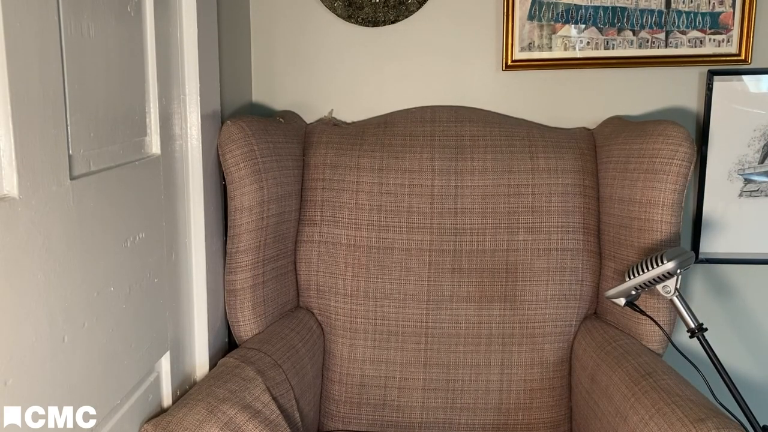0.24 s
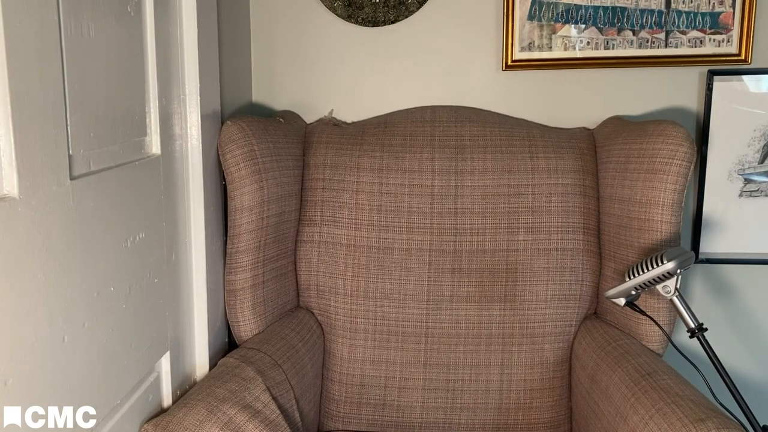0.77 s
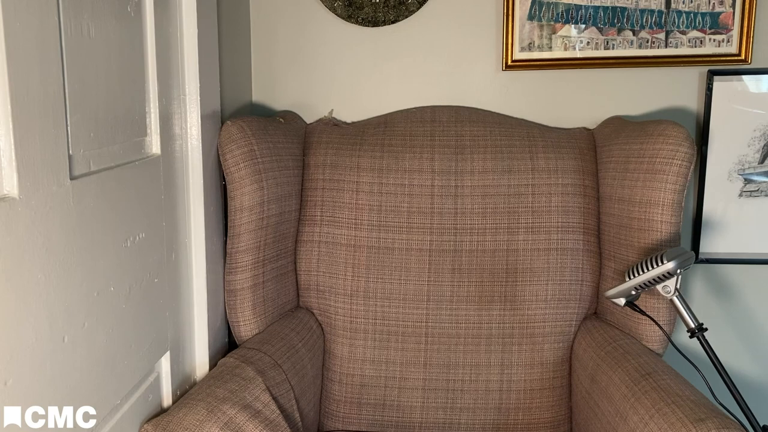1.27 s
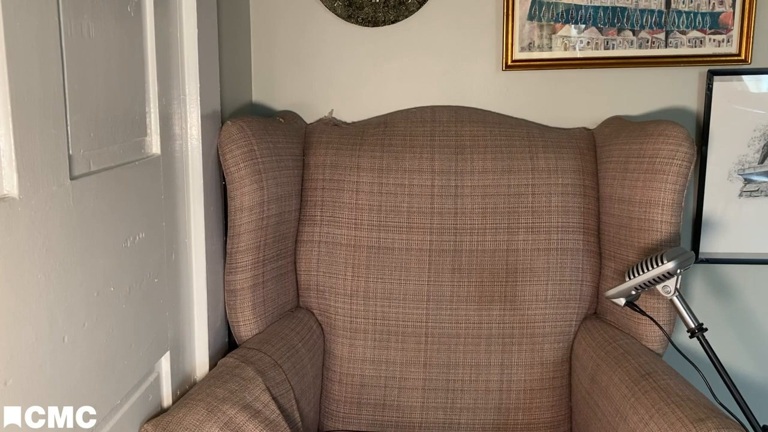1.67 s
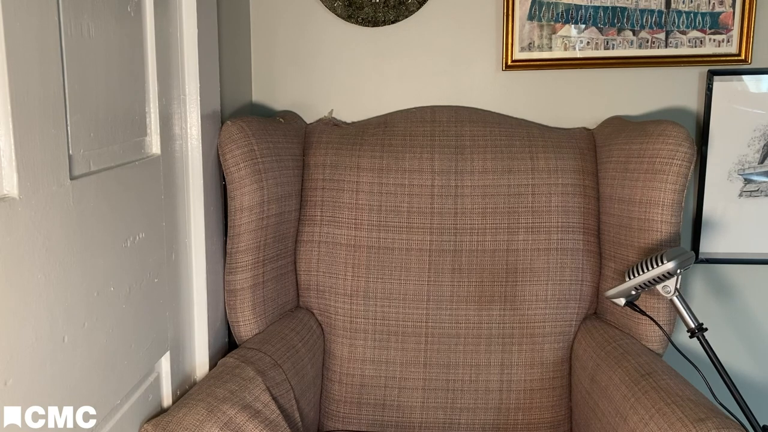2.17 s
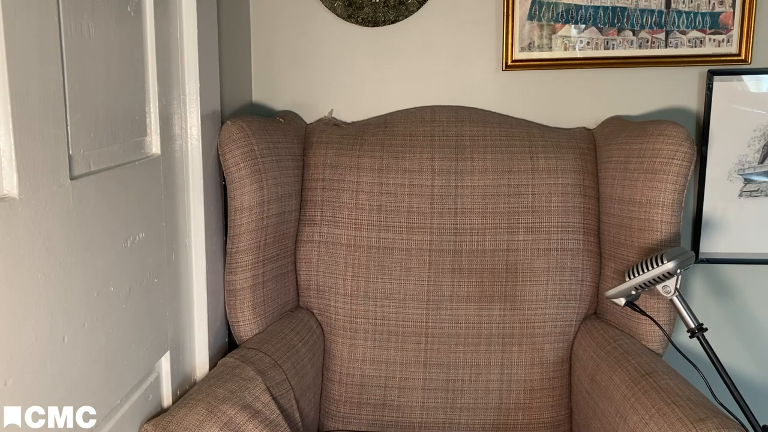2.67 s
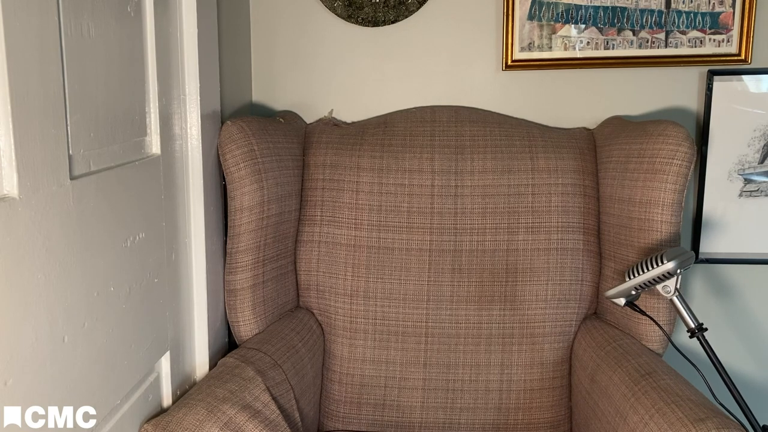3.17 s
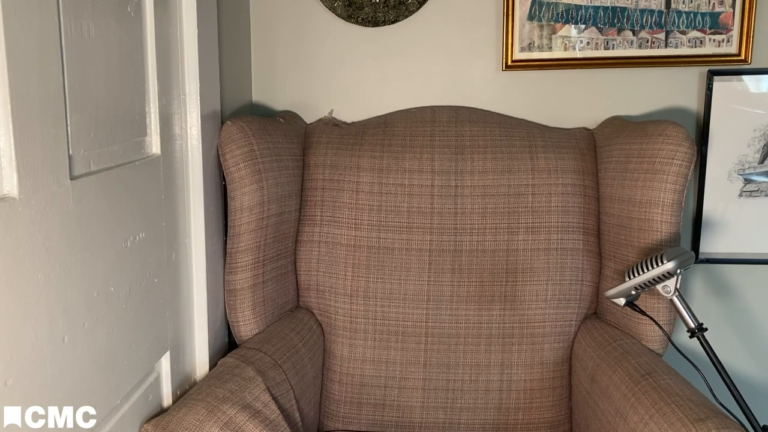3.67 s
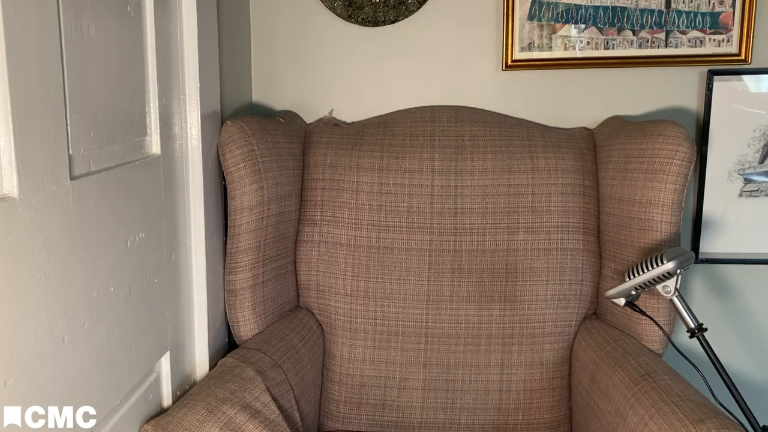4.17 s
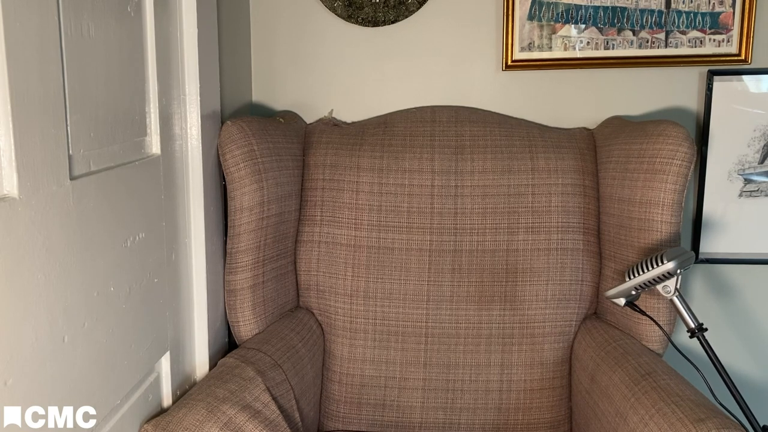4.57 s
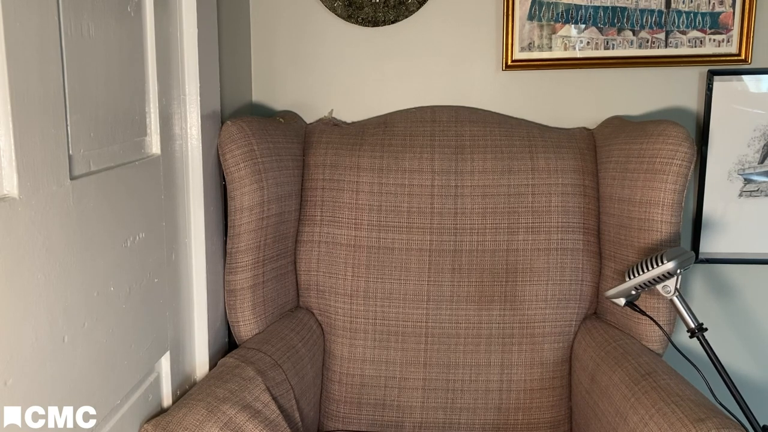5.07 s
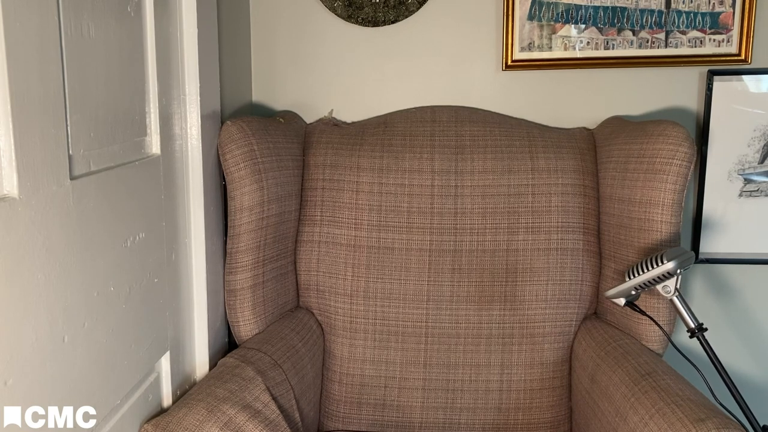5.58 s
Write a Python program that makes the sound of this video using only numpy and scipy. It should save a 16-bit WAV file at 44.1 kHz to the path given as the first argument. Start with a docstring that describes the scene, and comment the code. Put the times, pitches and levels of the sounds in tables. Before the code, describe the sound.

Muffled footsteps and cloth rustle stop, near silence follows, then a heavy door is tugged loose, groans into its frame, slams and clicks shut.

```python
"""Heavy door in an echoing room

Someone shuffles and knocks about in a bare room, then goes to a heavy wooden door: it is tugged free
with a deep thump, judders into its frame and bangs shut; the handle is let go and the latch snaps home.
Contacts are noise bursts with a decaying room echo, the leaf and floor ring as decaying sines, rubbing is
a hail of random slips and the judder a stack of sine partials. Low rumble and faint whine fill the pauses."""
import sys
import numpy as np
from scipy import signal
from scipy.fft import rfft, irfft
from scipy.io import wavfile

SR = 44100
rng = np.random.default_rng(int(sys.argv[2]) if len(sys.argv) > 2 else 0)


def store_pcm(level_fs):
    """Save levels as 16-bit WAV."""
    pcm = np.round(np.clip(level_fs, -1, 1) * 32767).astype(np.int16)
    wavfile.write(sys.argv[1], SR, np.atleast_2d(pcm).T)


N = 257544
TIME = np.arange(N) / SR
TAIL = TIME[:SR]   # one second, the length of every single contact

# wood meeting wood at the door: start_s, level_db, brightness_db_per_octave, fittings_rattle_db
DOOR_BLOWS = [(3.381, -35, -2, -62), (3.386, -27, 2.5, -35.5), (3.41, -25.5, 0, -44),
              (3.527, -32.5, 0.15, -59), (4.128, -17.5, -4.5, -19), (4.144, -15, -4.5, -21),
              (4.165, -19.5, -3, -35.5), (4.183, -39, 0, -45)]
# colour of wood on wood: frequency_hz, level_db
WOOD_COLOUR = [(20, -48), (55, -10), (100, 4.5), (160, 3), (250, 0.5), (400, 1), (700, -2.5), (1100, 0),
               (1500, -5), (2200, -6), (3000, -13), (4200, -9), (5500, -15.5), (7300, -16), (9000, -24),
               (15500, -40)]
# door panels, hinges and lock case: centre_hz, half_width_hz, level_db
FITTING_RESONANCES = [(528, 13, 5.5), (657, 47, 2.5), (773, 13, 5.5), (1017, 10, 3), (1190, 11, 6.5),
                      (1950, 12, -11), (2020, 8, 4), (2330, 6.5, 10.5), (2280, 710, -0.5), (2960, 130, -5),
                      (3170, 97, -5), (4100, 940, -11.5)]
# the door leaf heaving: start_s, level_db, seated (0 swinging free, 1 seated in the frame), dead_thud_db
DOOR_THUMPS = [(3.387, -24, 0.61, -20), (3.409, -4.5, 0.097, -5.5), (3.469, -20, 0, -35),
               (3.699, -19.5, 0.11, -57), (3.774, -23.5, 0.97, -48), (3.872, -22.5, 0.18, -43),
               (4.143, -10.5, 1, 0.5), (4.202, -3, 0.74, 9.5)]
# modes of door and room: frequency_hz, free_db, seated_db, t60_s
DOOR_MODES = [(65.74, -22, 2, 0.65), (71.55, 5, -39, 0.57), (75.8, -3, -22, 0.49), (84.8, -2.5, -5, 0.43),
              (94.34, -6.5, -2, 0.52), (105, -18.5, -23, 0.81), (137.9, -14, -11, 0.48),
              (159.6, -51, -21.5, 0.77), (212, -35, -12, 0.16), (258, -28.5, -23, 0.4)]
# dead thud under the thumps: frequency_hz, level_db, t60_s
DEAD_THUD_MODES = [(82.5, 3, 0.066)]
# partials of the juddering door: multiple_of_slip_rate, level_db
JUDDER_PARTIALS = [(1, 0.5), (2, -4.5), (3, 0.5), (4, -21), (5, -13), (6, -19), (7, -30)]
# colour of the door edge rubbing on its frame: frequency_hz, level_db
RUB_COLOUR = [(30, -36), (120, -16), (250, 0.5), (600, 2.5), (1300, -2.5), (2400, -4), (3200, -10),
              (4400, -11), (5800, -18), (7500, -21.5), (9500, -32.5), (15000, -34)]
# the latch bolt springing out: start_s, level_db (before the trims for snap and ring)
LATCH_HITS = [(4.546, -42), (4.551, -31.5), (4.562, -28.5)]
# colour of the steel snap: frequency_hz, level_db
STEEL_COLOUR = [(50, -19), (200, -4.5), (350, -1), (700, -3), (1500, -4.5), (2500, -1), (3300, 0),
                (5000, -2), (5800, -7), (6800, -2), (7800, -9.5), (9300, -8), (11500, -18), (13600, -12),
                (14400, -9), (15300, -23)]
# the bolt and its strike plate: centre_hz, half_width_hz, level_db
LATCH_RESONANCES = [(1790, 19, -0.5), (2220, 90, -3), (2540, 25, 3.5), (2560, 15, 1), (2626, 14, 5),
                    (3030, 55, -2.5), (3510, 16, -3), (4300, 35, -6), (4870, 43, -4), (6450, 24.4, -1),
                    (6900, 140, -10), (9250, 180, -13.5), (10530, 100, -11.5), (14420, 130, -5)]
# heavier scuffs of a foot: peak_s, level_db
FOOT_SCUFFS = [(.002, -32), (0.127, -24), (.195, -29), (.335, -33)]
# colour of feet on the floor: frequency_hz, level_db
SCUFF_COLOUR = [(41, -36), (70, -16), (129, 3.5), (183, -16), (312, -7.5), (516, -4.5), (576, -9),
                (623, -9), (788, -16), (2650, -45), (3000, -56), (3900, -71), (6600, -120)]
# swishes of cloth: peak_s, level_db
CLOTH_SWISHES = [(.01, -51), (.16, -52.5), (.36, -42.5), (.63, -50.5), (.88, -44.5)]
# colour of moving cloth: frequency_hz, level_db
CLOTH_COLOUR = [(900, 4), (1600, 0), (2400, 1), (3500, -10), (5500, -11), (7500, -17), (10000, -32),
                (15000, -31)]
# knocks on furniture and floor: start_s, rap_db, thud_db
KNOCKS = [(0.025, -47, -45), (0.194, -51, -42), (0.327, -42, -30.5), (0.434, -48, -44), (0.545, -41.5, -32),
          (.729, -28, -27.5), (.865, -41.5, -36.5)]
# colour of a rap: frequency_hz, level_db
RAP_COLOUR = [(25, -37), (90, 3), (170, 3), (320, 10), (480, -5), (800, -4.5), (1300, -12.5), (2400, -16.5),
              (3500, -26.5), (7000, -43), (14000, -49)]
# modes of the thudding floor: frequency_hz, level_db, t60_s
FLOOR_MODES = [(92.8, 1.5, 0.52), (108.9, -4.5, 0.6), (137.7, 3.5, 0.32), (199, -17, 0.41)]
# strokes of a dry squeak, wood on wood: start_s, end_s, level_db
SQUEAK_STROKES = [(0.745, 0.778, -46), (0.884, 0.916, -47)]
# the pitches of the squeak: centre_hz, half_width_hz, level_db
SQUEAK_RESONANCES = [(2235, 105, 3), (2480, 130, -10)]
# small clicks and creaks: start_s, level_db, centre_hz, half_width_octaves
SOFT_TICKS = [(.174, -32.5, 500, 0.12), (.265, -59, 4000, 0.41), (0.357, -45, 4100, 0.48),
              (0.598, -38.5, 218, 0.22), (0.806, -43, 317, 0.17), (.81, -57, 4300, 0.14),
              (.825, -58, 6900, 0.38), (1.167, -58.5, 2200, 0.3), (1.42, -63.5, 6900, 1.5),
              (1.743, -47, 282, 0.72), (1.762, -50.5, 1700, 0.59), (1.935, -56, 2630, 0.77),
              (2.091, -49, 1750, 0.52), (2.151, -60, 3600, 0.6), (2.391, -64.5, 4480, 1.1),
              (2.865, -61, 990, 1.1), (3.168, -58.5, 2180, 0.25), (3.313, -55.5, 910, 0.6)]
# sharp little clicks: start_s, level_db
SHARP_CLICKS = [(2.744, -57.5), (2.953, -55.5), (5.208, -53.5)]
# colour of a sharp click: frequency_hz, level_db
CLICK_COLOUR = [(400, -13), (1000, -0.5), (2200, 1.5), (3000, -2), (4200, -4), (5500, -5), (6700, -7.5),
                (7500, -2), (8400, -16), (14000, -15.5)]
# colour of the room's rumble and hiss: frequency_hz, level_db
RUMBLE_COLOUR = [(15, -30), (25, -5), (64, -8), (96, -1), (204, -17.5), (297, -17.5), (322, -25.5),
                 (359, -18.5), (389, -20.5), (567, -24.5), (919, -25), (1450, -33.5), (2060, -32),
                 (2420, -37.5), (15500, -49)]
# thin tones of the room: centre_hz, half_width_hz, level_db
WHINE_TONES = [(2085, 30, -73.5), (357, 7, -70), (296, 7, -74), (91.5, 5, -57)]
# how long the echo lasts in each band: frequency_hz, t60_s
ROOM_DECAY = [(100, 0.82), (300, 0.53), (800, 0.62), (2000, 0.61), (4500, 0.66), (7500, 0.63),
              (15000, 0.33)]

# the swinging door grazes its frame once
GRAZE_S, GRAZE_DB, GRAZE_SLOPE_DB_PER_S = 3.735, -33.5, 330
# then it wedges in: pressure builds from first touch until it is seated, and lets go
WEDGE_TOUCH_S, WEDGE_SEATED_S, WEDGE_RELEASE_DB_PER_S = 3.874, 4.125, 128
WEDGE_RUB_DB, WEDGE_JUDDER_DB = -34, -13.5   # at full pressure
JUDDER_HZ = 46.9   # centre of the slightly wavering slip rate
# power of the pressure that the lowest partial follows; added for each higher one
JUDDER_GROWTH, JUDDER_SHARPENING = 1.7, 0.2
# the shuffling goes on until this moment, then dies quickly
SHUFFLE_END_S, SHUFFLE_STOP_DB_PER_S = 0.9, 328
# feet slide over the floor, ever more lightly
SLIDE_START_S, SLIDE_DB, SLIDE_FADE_DB_PER_S = 0.073, -36.5, 10.5
SCUFF_RISE_DB_PER_S, SCUFF_FALL_DB_PER_S = 650, 265
SWISH_RISE_DB_PER_S, SWISH_FALL_DB_PER_S = 53, 89
FLOOR_LAG_S = 0.00796   # the floor gives a moment after the rap
SQUEAK_RISE_DB_PER_S, SQUEAK_FALL_DB_PER_S = 400, 200
RUMBLE_DB = -50.5
CUTOFF_HZ = 15700


def door_blows(pivot_hz=1800):
    """Hard contacts crack and shake the fittings; the leaf booms in modes rebalanced by the frame's hold."""
    out, hz = np.zeros(N), bins(SR)
    for start_s, level_db, brightness, rattle_db in DOOR_BLOWS:
        crack_db = at_hz(WOOD_COLOUR, hz) + brightness * np.log2(hz / pivot_hz)
        add(out, start_s, from_db(level_db) * echoing(crack_db, build_s=0.0049))
        rattle = echoing(resonances_db(FITTING_RESONANCES, hz), build_s=0.0017)
        add(out, start_s, from_db(rattle_db) * rattle)
    for start_s, level_db, seated, thud_db in DOOR_THUMPS:
        modes = [(mode_hz, np.interp(seated, [0, 1], [free_db, seated_db]), t60)
                 for mode_hz, free_db, seated_db, t60 in DOOR_MODES]
        boom = from_db(level_db) * ring(modes, build_s=0.022)
        thud = from_db(thud_db) * ring(DEAD_THUD_MODES, build_s=0.0066)
        add(out, start_s, boom + thud)
    return out


def door_drag(waver=0.018):
    """The edge grazes the frame, then sticks and slips at a nearly steady rate, harder as it wedges in."""
    building = np.clip((TIME - WEDGE_TOUCH_S) / (WEDGE_SEATED_S - WEDGE_TOUCH_S), 0, 1)
    pressure = building * stroke(0, WEDGE_SEATED_S, 0, WEDGE_RELEASE_DB_PER_S)
    graze = from_db(GRAZE_DB) * stroke(GRAZE_S, GRAZE_S, GRAZE_SLOPE_DB_PER_S, GRAZE_SLOPE_DB_PER_S)
    slip_hz = JUDDER_HZ * (1 + waver * drift(13.8))
    phase = 2 * np.pi * np.cumsum(slip_hz) / SR
    groan = 0
    for multiple, level_db in JUDDER_PARTIALS:
        k = round(multiple)
        growth = pressure ** (JUDDER_GROWTH + JUDDER_SHARPENING * (k - 1))
        # reflections give each partial its own phase and swell
        swell = from_db(level_db + 2 * drift(23))
        groan = groan + growth * swell * np.cos(k * phase + rng.uniform(0, 2 * np.pi))
    rub = friction(graze + from_db(WEDGE_RUB_DB) * pressure, RUB_COLOUR, slips_per_s=1800)
    return from_db(WEDGE_JUDDER_DB) * groan + rub


def latch(snap_trim_db=-0.5, ring_trim_db=-3):
    """The steel bolt snaps into its plate, a broad crack over narrow metal resonances."""
    out, hz = np.zeros(N), bins(SR)
    for start_s, level_db in LATCH_HITS:
        snap = echoing(at_hz(STEEL_COLOUR, hz), build_s=0.002)
        add(out, start_s, from_db(level_db + snap_trim_db) * snap)
        ringing = echoing(resonances_db(LATCH_RESONANCES, hz), build_s=0.0044)
        add(out, start_s, from_db(level_db + ring_trim_db) * ringing)
    return out


def shuffling():
    """Feet and cloth rub in small slips; knocks rap and set the floor thudding."""
    moving = stroke(0, SHUFFLE_END_S, 0, SHUFFLE_STOP_DB_PER_S)
    slide = from_db(SLIDE_DB) * stroke(SLIDE_START_S, SLIDE_START_S, SCUFF_RISE_DB_PER_S, SLIDE_FADE_DB_PER_S)
    scuffs = sum(from_db(level_db) * stroke(peak_s, peak_s, SCUFF_RISE_DB_PER_S, SCUFF_FALL_DB_PER_S)
                 for peak_s, level_db in FOOT_SCUFFS)
    swishes = [from_db(level_db) * stroke(peak_s, peak_s, SWISH_RISE_DB_PER_S, SWISH_FALL_DB_PER_S)
               for peak_s, level_db in CLOTH_SWISHES]
    cloth = np.max(swishes, axis=0)
    out = friction(moving * np.hypot(slide, scuffs), SCUFF_COLOUR, slips_per_s=530)
    out = out + friction(moving * cloth, CLOTH_COLOUR, slips_per_s=900)
    for start_s, rap_db, thud_db in KNOCKS:
        rap = echoing(at_hz(RAP_COLOUR, bins(SR)), build_s=0.0017)
        add(out, start_s, from_db(rap_db) * rap)
        add(out, start_s + FLOOR_LAG_S, from_db(thud_db) * ring(FLOOR_MODES, build_s=0.0066))
    return out


def squeak():
    """Dry rubbing excites a narrow pair of resonances."""
    pressure = sum(from_db(level_db) * stroke(start_s, end_s, SQUEAK_RISE_DB_PER_S, SQUEAK_FALL_DB_PER_S)
                   for start_s, end_s, level_db in SQUEAK_STROKES)
    return pressure * noise(resonances_db(SQUEAK_RESONANCES, bins(N)), N)


def ticks():
    """Light contacts, each sounding round its own pitch, and a few sharp clicks."""
    out, hz = np.zeros(N), bins(SR)
    for start_s, level_db, centre_hz, octaves in SOFT_TICKS:
        colour_db = -20 * np.log10(1 + (np.log2(hz / centre_hz) / octaves) ** 2)
        add(out, start_s, from_db(level_db) * echoing(colour_db, build_s=0.0021))
    for start_s, level_db in SHARP_CLICKS:
        add(out, start_s, from_db(level_db) * echoing(at_hz(CLICK_COLOUR, hz), build_s=0.0023))
    return out


def room_tone():
    """Low rumble and hiss from shaped noise, with thin, unsteady tones from very narrow noise bands."""
    hz = bins(N)
    tones = 0
    for centre_hz, half_width_hz, level_db in WHINE_TONES:
        colour_db = -20 * np.log10(1 + ((hz - centre_hz) / half_width_hz) ** 2)
        tones = tones + from_db(level_db) * noise(colour_db, N)
    return from_db(RUMBLE_DB) * noise(at_hz(RUMBLE_COLOUR, hz), N) + tones


def friction(gain, colour, slips_per_s, count=3):
    """Many small random slips at a few points of contact, each point with its own echo in the room."""
    out = 0
    for _ in range(count):
        slipping = rng.random(N) < slips_per_s / count / SR
        slips = rms_one(rng.standard_normal(N) * slipping)
        response = echoing(at_hz(colour, bins(SR)))
        out = out + signal.fftconvolve(slips * gain, response / np.linalg.norm(response))[:N]
    return out / np.sqrt(count)


def echoing(colour_db, build_s=0.00067):
    """One contact heard across the room: dense reflections build up, then die band by band."""
    hz, spectrum = bins(SR), rfft(noise(colour_db, SR))
    centres, t60s = np.transpose(ROOM_DECAY)
    out = 0
    for share, t60 in zip(np.eye(len(centres)), t60s):
        # overlapping bands that add up to the whole spectrum
        band = irfft(spectrum * np.interp(np.log(hz), np.log(centres), share), SR)
        out = out + band * np.exp(-np.log(1000) * TAIL / t60)
    return out * (1 - np.exp(-TAIL / build_s))


def ring(modes, build_s):
    """Decaying sines that swell as the blow spreads through the body."""
    sines = 0
    for hz, level_db, t60 in modes:
        decay = np.exp(-np.log(1000) * TAIL / t60)
        sines = sines + from_db(level_db) * np.sin(2 * np.pi * hz * TAIL) * decay
    return sines * (1 - np.exp(-(TAIL / build_s) ** 2))


def stroke(start_s, end_s, rise_db_per_s, fall_db_per_s):
    """Gain that swells up to the start, holds at 1 and dies away after the end."""
    before_s, after_s = np.maximum(start_s - TIME, 0), np.maximum(TIME - end_s, 0)
    return from_db(-rise_db_per_s * before_s - fall_db_per_s * after_s)


def drift(rate_hz):
    """Slow random wander of unit spread, drawn at every hundredth sample."""
    coarse = TIME[::100]
    hz = np.fft.rfftfreq(len(coarse), coarse[1])
    return np.interp(TIME, coarse, noise(-40 * np.log10(1 + hz / rate_hz), len(coarse)))


def resonances_db(peaks, hz):
    """Summed power of a set of resonances at each frequency, in decibels."""
    power = sum(from_db(level_db) ** 2 / (1 + ((hz - centre_hz) / half_width_hz) ** 2) ** 2
                for centre_hz, half_width_hz, level_db in peaks)
    return 10 * np.log10(power)


def noise(level_db, size):
    """Noise of unit power, coloured by the level at each frequency."""
    return rms_one(irfft(rfft(rng.standard_normal(size)) * from_db(level_db), size))


def at_hz(points, hz):
    """Read a colour table on a log-frequency axis."""
    table_hz, value = np.transpose(points)
    return np.interp(np.log(hz), np.log(table_hz), value)


def bins(size):
    """Frequencies of a real transform, kept at 1 Hz or above for the logarithms."""
    return np.maximum(np.fft.rfftfreq(size, 1 / SR), 1)


def from_db(db):
    """Decibels to gain."""
    return 10 ** (np.asarray(db) / 20)


def rms_one(x):
    """Scale to unit power."""
    return x / np.sqrt(np.mean(x ** 2) + 1e-20)


def add(out, start_s, sound):
    """Mix a sound in at a time."""
    at = max(round(start_s * SR), 0)
    out[at:at + len(sound)] += sound[:N - at]


def scene():
    """Everything meets at one microphone."""
    door = door_blows() + door_drag() + latch()
    person = shuffling() + squeak()
    return (door + person + ticks() + room_tone())[None]


def record(dry, low_cut_hz=34):
    """The microphone loses the deepest bass, peaks beyond full scale clip, the top is cut."""
    high_pass = signal.butter(3, low_cut_hz, "high", fs=SR, output="sos")
    thinned = signal.sosfilt(high_pass, dry)
    low_pass = signal.ellip(10, 0.1, 80, CUTOFF_HZ, fs=SR, output="sos")
    return signal.sosfilt(low_pass, np.clip(thinned, -1, 1))


dry = scene()
out = record(dry)
store_pcm(out)
```